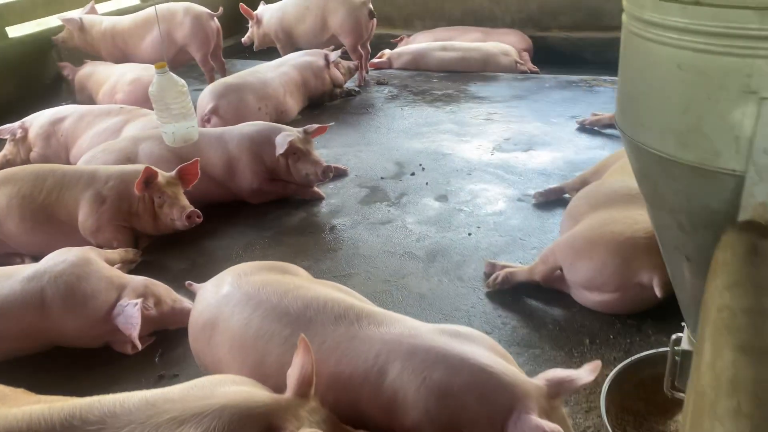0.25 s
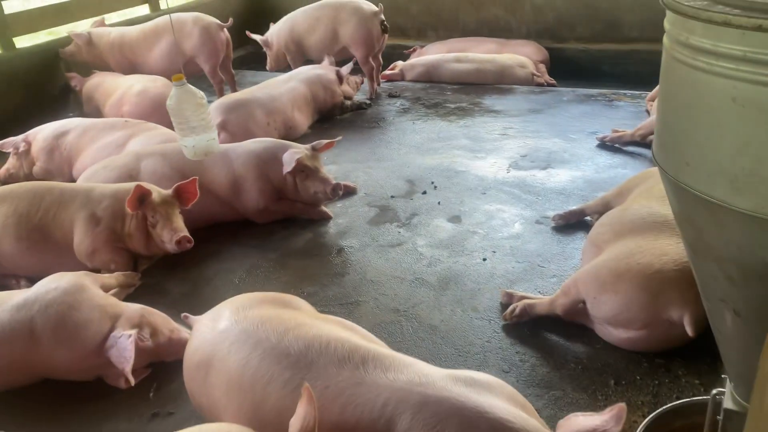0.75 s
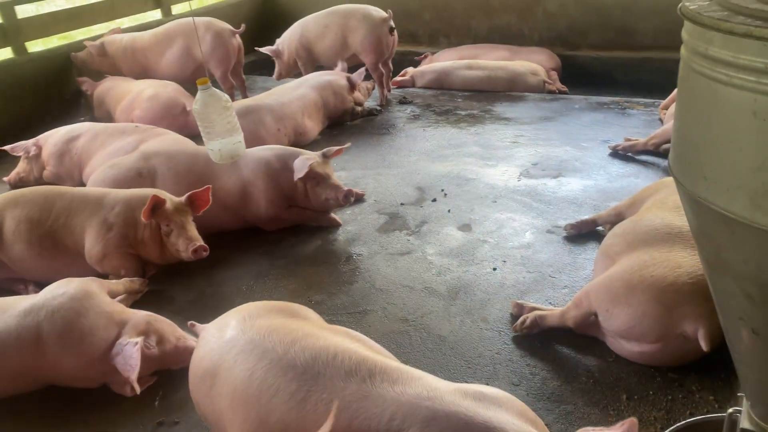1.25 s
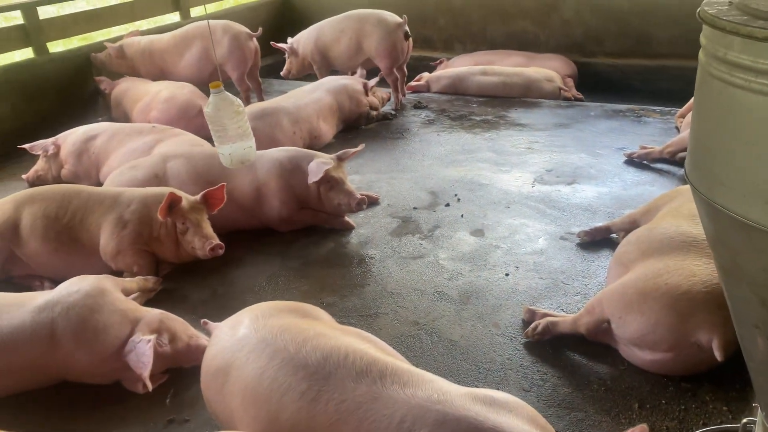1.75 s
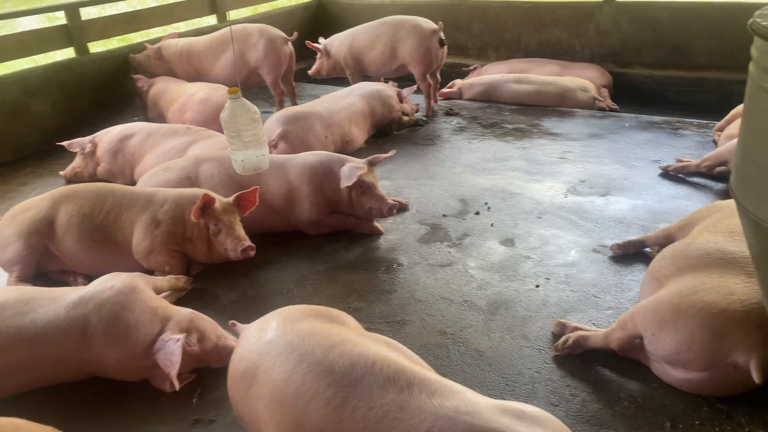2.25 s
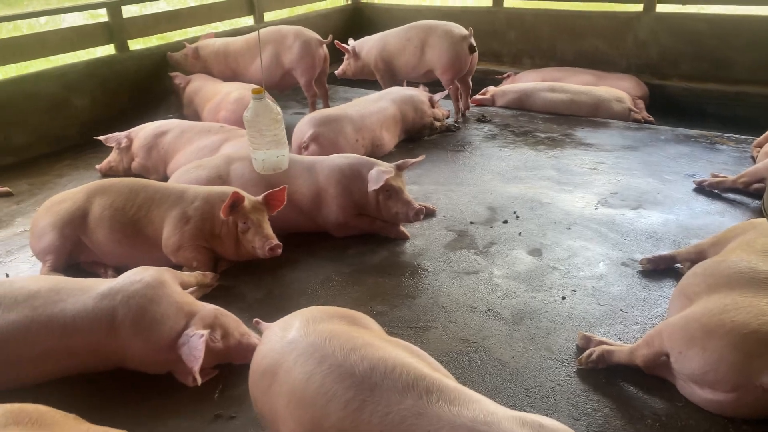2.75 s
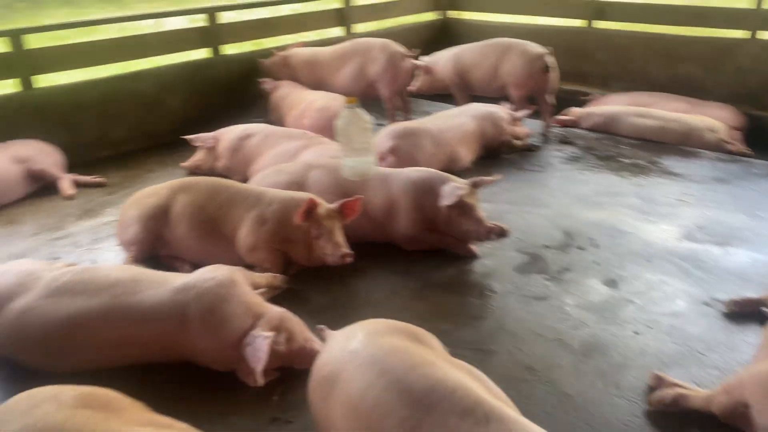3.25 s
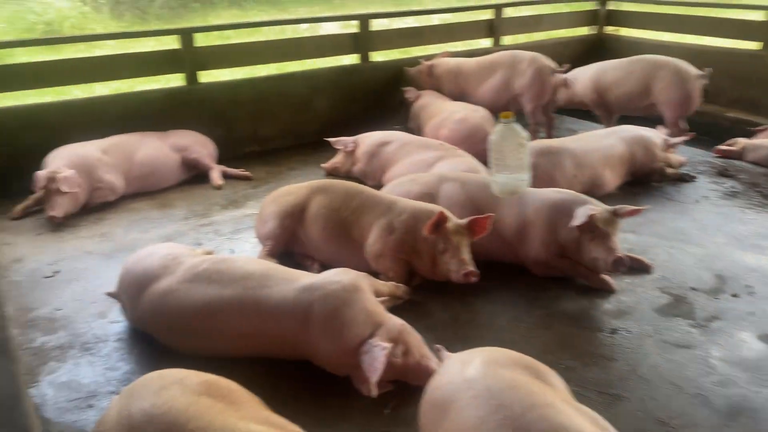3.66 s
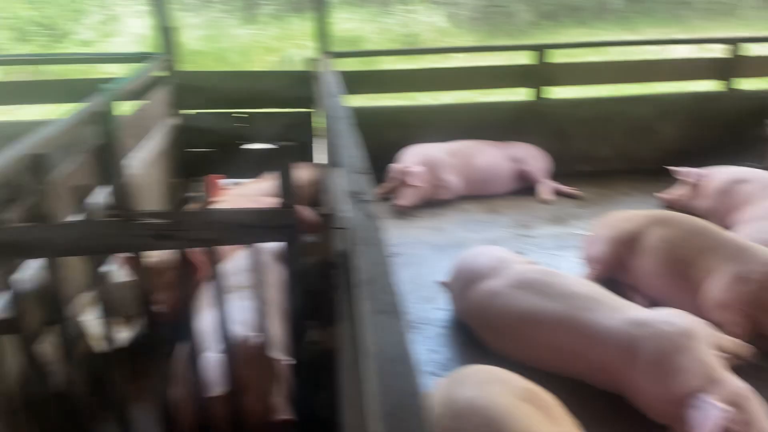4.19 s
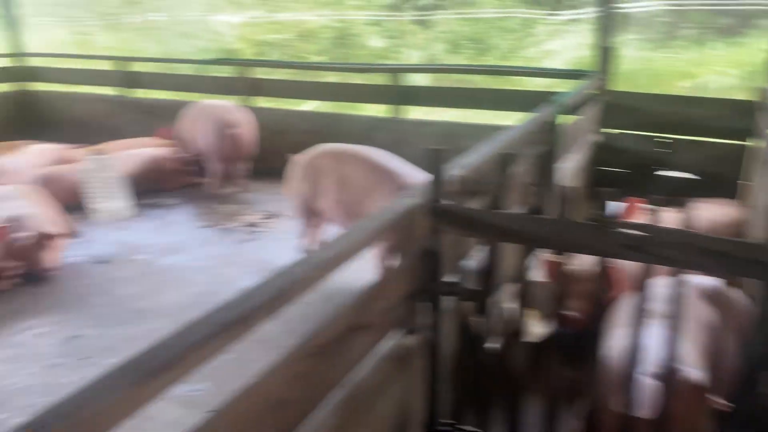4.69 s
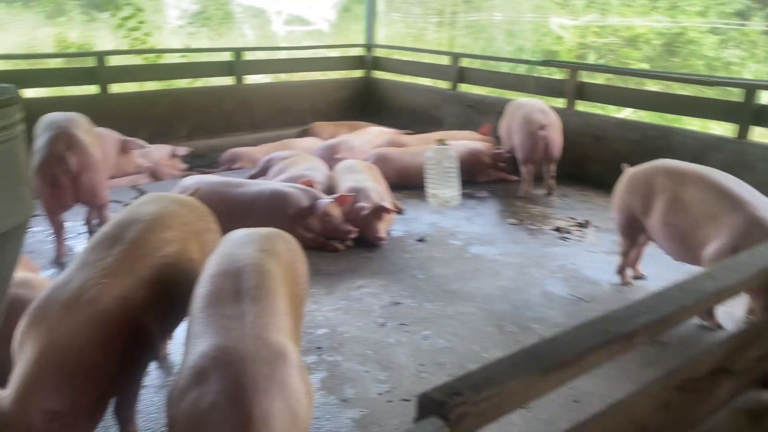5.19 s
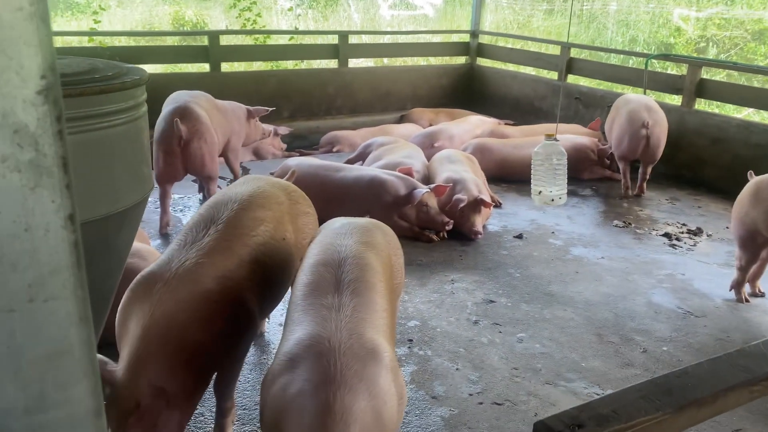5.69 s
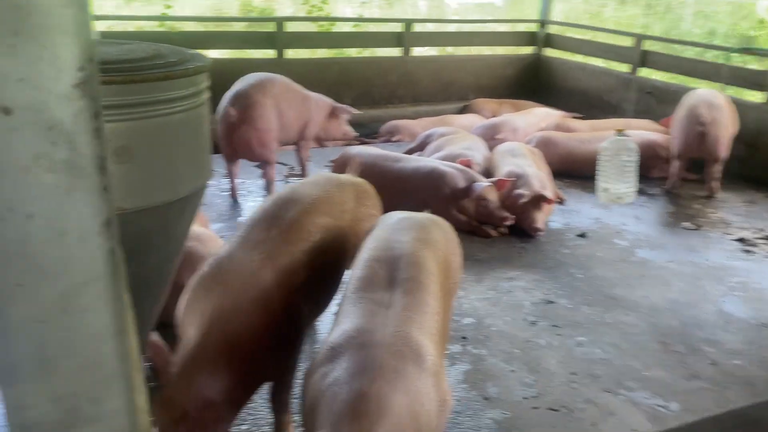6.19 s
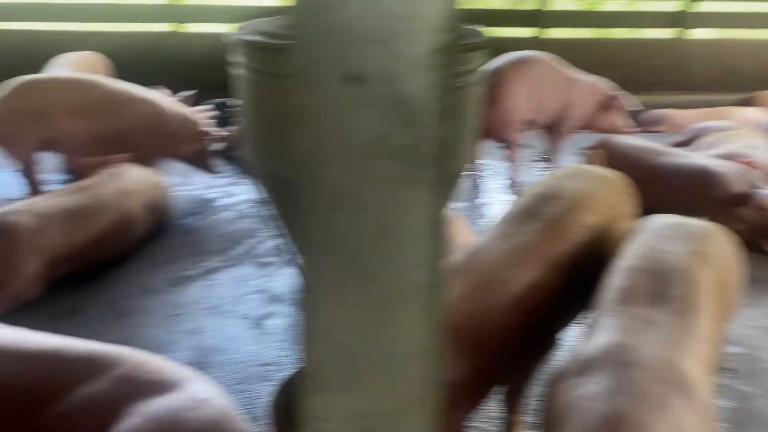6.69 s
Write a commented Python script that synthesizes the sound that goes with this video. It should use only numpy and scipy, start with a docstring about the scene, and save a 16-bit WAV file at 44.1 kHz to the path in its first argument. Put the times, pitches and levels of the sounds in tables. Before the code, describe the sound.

Pigs in an open concrete shed give short low grunts close by, over a throbbing herd murmur, soft thuds and bright ticking clicks.

```python
"""Pigs grunt close to a two-port microphone in an open concrete shed. Each grunt is a short train of slow
vocal-fold slaps, clicks with puffs of air, ringing in chest, throat, mouth, snout and nose.
Gliding tones make whines, a few steady partials make one low groan at first, and breath rushes under each grunt.
Farther pigs throb as a murmur of filtered noise, bodies thud low, and gear and hooves tick as bright cracks.
Feedback delays give the shed's echo; the two ports hear the near pigs with a small lag."""
import sys
import numpy as np
from scipy import signal
from scipy.io import wavfile

SR = 44100
rng = np.random.default_rng(int(sys.argv[2]) if len(sys.argv) > 2 else 0)


def digitize_waveform(pressure):
    """Quantize a signal to 16-bit integers and store it at the path in sys.argv[1].

    Rows of a 2-D input are taken as channels; values are limited to [-1, 1].
    """
    field = np.atleast_2d(pressure).T
    bounded = np.clip(field, -1, 1)
    quanta = np.round(bounded * 32767).astype(np.int16)
    wavfile.write(sys.argv[1], SR, quanta)


N = 306054

# Near grunts: first slap t/s, last slap t/s, slaps, share of the swell, hurry (above 0: gaps shrink at first),
#   nominal loudest point (0 first slap, 1 last) of chest, throat and mouth, the same of snout and nose,
#   left port's lag/ms before the stretch by resonance,
#   then nominal f/Hz and level/dB of chest, throat, mouth, snout and nose in turn,
#   breathiness level/dB, glide of all but the chest (share of f), level/dB of the snout's neighbour
#   against the snout, rasp f/Hz, rasp level/dB against the snout
GRUNTS = [(0.1305, 0.212, 4, 0.59, -0.07, 1.1, 0.42, -0.31, 195, -35, 420, -25, 1278, -27, 2770, -42, 4920, -32.5, 3, -0.091, 9, 7000, 7),
          (0.252, 0.343, 4, .9, 0.05, 0.6, 0.71, -0.25, 314, -33, 820, -60, 1210, -32, 1840, -31, 3820, -34, -4, -0.00029, -15, 2000, 2),
          (0.574, 0.651, 4, .5, 0.038, 0.57, 0.29, 0.066, 159.4, -46, 925, -36, 1060, -38, 2860, -45, 3800, -54, 2, 0.013, 0, 1900, 21.5),
          (0.8553, 0.9477, 4, 0.52, 0.18, 0.35, 0.45, 0.27, 204, -30, 915, -29.5, 1387, -27, 2164, -23.5, 4400, -32, 1.5, -0.02, -6, 2660, 5),
          (1.307, 1.352, 3, 0.64, 0.011, 0.54, 0.7, 0.35, 293, -34, 805, -35, 1226, -26, 1840, -69, 3000, -58, -4.5, -0.15, 0, 2000, 15),
          (1.405, 1.491, 4, 0.69, 0.074, 0.62, 0.0038, 0.25, 221, -31.5, 895, -29.5, 1363, -30.5, 2410, -33.5, 4200, -43, 6, -0.21, -1, 1930, 7),
          (1.8914, 2.041, 6, 0.99, 0.23, 0.59, 0.51, 0.17, 237, -20.5, 705, -18, 1360, -16.5, 2600, -19, 4100, -25.5, -8.5, -0.049, 0, 2820, 18),
          (1.883, 1.933, 3, 0.57, -0.087, 0.9, 0.97, .12, 211, -29, 373, -25.5, 1200, -47, 3310, -63, 5020, -32, 6.5, 0.0069, 0, 2000, 15),
          (2.217, 2.275, 3, .4, 0.041, 1, 0.66, 0.23, 226, -29, 930, -35, 1465, -25, 2620, -28.5, 3280, -34, 0, 0, -5, 1940, 12),
          (2.506, 2.554, 3, 0.81, -0.1, 0, 0, 0.29, 245, -65, 690, -38, 1325, -33, 2160, -59, 3430, -47, 0, -0.087, 0, 2000, 15),
          (2.6042, 2.665, 3, 0.76, -0.12, 0.76, 0.67, 0.48, 250, -30, 650, -27.5, 1160, -55, 2220, -68, 3370, -44, -0.5, -0.028, 0, 2000, 15),
          (3.7635, 3.8473, 4, 1, -0.23, 1, 0.58, 0.19, 204, -33.5, 830, -29, 1290, -31, 2160, -37.5, 3900, -25.5, -2, 0.04, -13, 4300, 24),
          (4.268, 4.367, 4, 0.91, -.01, 0.69, 0.64, 0.0045, 225, -37, 365, -28, 1102, -26.5, 2840, -36, 4960, -45, 5, 0.033, 3.5, 1770, 13.5),
          (5.258, 5.334, 4, 1.1, 0.038, 1.1, 0.83, 0.09, 207, -33, 820, -45, 1255, -36.5, 2380, -32.5, 5230, -38, -3.5, -0.026, -8, 4100, 0),
          (5.5514, 5.635, 4, .9, 0.0008, 0, 0.26, 0.34, 170, -34, 496, -58, 1025, -36, 2800, -65, 4000, -53, -3, -0.038, 0, 2020, 15),
          (5.903, 5.951, 2, 0.53, 0, 0.65, 0.5, 0.36, 186, -37, 600, -30.5, 1180, -45, 2550, -57, 4950, -60, 1, 0.018, 0, 2000, 15),
          (5.955, 6.041, 4, 1.1, 0.046, 0.2, 0.41, 0.19, 184, -33, 663, -28, 1225, -36, 2610, -36, 3550, -33, 2.5, -0.061, -4, 1840, 21),
          (5.965, 6.011, 3, 0.8, -0.044, 0.8, 0.89, 0.24, 187, -53, 500, -44, 1200, -55, 2550, -50, 4850, -36, 10.5, 0.0028, 0, 2000, 15),
          (6.215, 6.371, 7, 1.1, 0.043, 1, 0.75, 0.088, 209, -38, 940, -36.5, 1390, -37.5, 2500, -40, 3900, -49, 3, -0.22, -1, 1390, 22.5),
          (6.211, 6.2945, 4, 0.79, -0.16, 0.2, 0.69, 0.029, 205, -53, 500, -55, 1610, -45, 2920, -44, 3550, -39, 5, -0.15, 0, 2000, 15),
          (6.413, 6.493, 3, .9, -0.024, 0.9, 0.73, 0.16, 200, -61, 626, -43, 1180, -49, 1850, -56, 4080, -42, 2, 0.013, 0, 2000, 15),
          (6.786, 6.93, 6, 1.05, -0.1, 0.41, 0.96, 0.23, 188, -40.5, 820, -33, 1165, -38, 2530, -48, 4000, -63, 4, -0.048, -3, 2000, 10)]


def from_db(db):
    """Decibels to gain."""
    return 10 ** (np.asarray(db) / 20)


def rms_one(x):
    """Scale to rms 1."""
    return x / np.sqrt(np.mean(x ** 2) + 1e-20)


def in_time(rows, outside=None):
    """Curve columns, one value per sample."""
    s, *columns = np.transpose(rows)
    return [np.interp(np.arange(N) / SR, s, c, outside, outside) for c in columns]


def at_hz(points, hz):
    """Read a spectrum on a log frequency axis."""
    point_hz, values = np.array(points).T
    return np.interp(np.log(hz), np.log(point_hz), values)


def drift(rate_hz):
    """Slow chance of spread 1: noise through two equal one-pole low-passes, drawn every 40 samples."""
    r = np.exp(-2 * np.pi * rate_hz * 40 / SR)
    noise = rng.standard_normal(N // 40 + 2002)
    slow = signal.lfilter([1], [1, -2 * r, r * r], noise)[2000:]  # settled part only
    return np.interp(np.arange(N) / 40, np.arange(len(slow)), rms_one(slow))


def ring(x, hz, width_hz):
    """A damped resonance: a unit click rings with a height near 1, dying faster when it is wider."""
    r, w = np.exp(-np.pi * width_hz / SR), 2 * np.pi * hz / SR
    return signal.lfilter([0, np.sin(w)], [1, -2 * r * np.cos(w), r * r], x)


def bloom(x, hz, width_hz):
    """A resonance passed twice: a unit click swells softly to a height near 1, with dark skirts."""
    twice = ring(ring(x, hz, width_hz), hz, width_hz)
    return twice * 2 * np.pi * np.e * width_hz / SR


def add(out, sound, s, lag_ms=0.):
    """Mix a mono sound in at s seconds, later at the left port by the lag."""
    for side, late in zip(out, (lag_ms / 2000, -lag_ms / 2000)):
        i = round((s + late) * SR)
        side[i:i + len(sound)] += sound[:N - i]


def swell(start, length, level_db, rise_db_per_s, fall_db_per_s, hold_gain_db=0.):
    """Gain that rises to the start, grows by hold_gain_db over the length, then falls; steps of 40 samples."""
    t = np.arange(0, N + 40, 40) / SR - start
    db = level_db + np.minimum(t, 0) * rise_db_per_s - np.maximum(t - length, 0) * fall_db_per_s
    db += hold_gain_db * (np.clip(t / length, 0, 1) - 1)
    return np.repeat(from_db(db), 40)[:N]


def grunts(rasp_click=0.11, puff_s=0.0085, leak_share=0.065, side_above=1.17, side_spread=2.4,
           rasp_width_hz=690.0):
    """Each slap is a click and a dying puff; air leaks until the next; the tract shifts from slap to slap."""
    # One value each for chest, throat, mouth, snout and nose:
    width_hz = [78.5, 170, 91, 232, 420]  # width of each of the two passes [Hz]
    swell_db = [7.4, 8.9, 27, 11.2, 10.5]  # faintest slap under the loudest, at a full share of the swell [dB]
    # added to the loudest point; below 0 = earlier in the grunt, only the nose peaks later
    peak_shift = [-0.11, -0.07, -0.034, -0.081, 0.043]
    puff_gain = [.06, .045, .045, .04, .035]  # air noise against the click, at 0 dB breathiness
    lag_stretch = [1, 1, 1, 1.65, 1.65]  # treble goes the long way round the microphone housing
    swell_shape = 2.1  # higher = flatter top, steeper ends
    slap_scatter = .015  # spread of each resonance from slap to slap, as a share of its frequency

    out, size = np.zeros((2, N)), SR // 9
    t = np.arange(size) / SR
    click = t == 0
    for (first, last, slaps, share, hurry, low_top, high_top, lag_ms, *tract,
         air_db, glide, side_db, rasp_hz, rasp_db) in GRUNTS:
        places = np.linspace(0, 1, round(slaps))
        times = first + (last - first) * (places + hurry * places * (1 - places) ** 2)
        leak = leak_share * (t < (last - first) / (len(places) - 1))
        gate = np.exp(-t / puff_s) + leak
        for place, s in zip(places, times):
            for k, (hz, level_db) in enumerate(zip(tract[::2], tract[1::2])):
                top = high_top if k >= 3 else low_top
                chance_db, shift = rng.standard_normal(2) * [1.0, slap_scatter]
                from_top = abs((place - top - peak_shift[k]) / max(top, 1 - top))
                effort_db = chance_db - share * swell_db[k] * from_top ** swell_shape
                hz = hz * (1 + shift + glide * (place - .5) * (k > 0))
                puff = puff_gain[k] * from_db(air_db) * gate * rng.standard_normal(size)
                air = puff + click
                sound = bloom(air, hz, width_hz[k])
                if k == 3:  # a broad neighbour lies just above, and air rasps through the snout
                    sound += from_db(side_db) * bloom(air, side_above * hz, side_spread * width_hz[k])
                    rasp = ring(1.51 * puff + rasp_click * click, rasp_hz, rasp_width_hz)
                    sound += from_db(rasp_db) * rasp
                add(out, from_db(level_db + effort_db) * sound, s, lag_ms * lag_stretch[k])
    return out


def breath():
    """Power of the air rushing under the grunts; follows how loudly chest, throat or mouth, and snout ring."""
    # In the chests', mouths' and snouts' bands:
    base_db = [-34.5, -39, -46]  # under a resonance at -30 dB, at 0 dB breathiness [dB]
    follows = [0.38, 1, 0.28]  # share of a change in that resonance's level
    rise_db_per_s, fall_db_per_s, growth_db = 180, 183, 5.5

    power = np.zeros((3, N))
    for row in GRUNTS:
        first, last, air_db = row[0], row[1], row[18]
        chest_db, throat_db, mouth_db, snout_db = row[9:16:2]
        for k, ring_db in enumerate((chest_db, max(throat_db, mouth_db), snout_db)):
            level_db = base_db[k] + follows[k] * (ring_db + 30) + air_db
            gain = swell(first, last - first, level_db, rise_db_per_s, fall_db_per_s, growth_db)
            power[k] += gain ** 2
    return power


def whines(lag_ms=.03, edge=.4):
    """Air singing in one narrow resonance of chest or nose: a gliding tone of wandering height and phase."""
    # Hums and whines: start t/s, length t/s, from f/Hz, to f/Hz, level/dB before the fades at both ends
    whine_list = [(.10, 0.13, 175.7, 191, -37.5), (0.124, 0.043, 2000, 1950, -43),
                  (.22, 0.061, 1190, 1180, -41), (0.328, 0.022, 3220, 3270, -44),
                  (0.166, 0.054, 385, 420, -30.5), (0.169, 0.18, 3660, 3870, -48),
                  (0.558, 0.069, 897, 916, -40.5), (.64, 0.12, 5800, 5920, -56),
                  (.68, 0.051, 4900, 4900, -59), (.57, .07, 4900, 4700, -53),
                  (0.759, 0.058, 1118, 1120, -43.5), (0.902, .012, 4565, 4760, -37.5),
                  (0.927, 0.013, 1410, 1400, -31), (0.967, 0.028, 192, 197, -30),
                  (1.29, 0.11, 1202, 1211, -42.5), (1.773, 0.054, 1350, 1360, -44),
                  (1.925, .14, 451, 397.3, -36), (2.049, 0.011, 263, 240, -24),
                  (2.02, 0.17, 1404, 1338, -48), (2.264, 0.071, 940, 916, -37), (2.93, 0.26, 170, 170, -39),
                  (3.109, 0.088, 1910, 1910, -47.5), (3.121, 0.056, 1270, 1287, -44),
                  (3.136, 0.064, 352, 356, -44), (3.221, 0.13, 2370, 2190, -51),
                  (3.253, 0.089, 2110, 2090, -49.5), (3.244, .16, 1995, 2040, -52.5),
                  (3.248, 0.17, 1333, 1323, -45.5), (3.74, 0.038, 190, 179, -35),
                  (3.742, 0.015, 4130, 4000, -48), (3.854, 0.043, 1233, 1197, -42.5),
                  (3.878, 0.1, 1566, 1540, -51), (4.257, 0.037, 216, 208, -22),
                  (4.285, 0.08, 232, 228, -31.5), (4.306, 0.061, 392, 438, -31),
                  (4.3, 0.015, 5200, 5100, -43), (4.308, 0.075, 717, 760, -39),
                  (4.324, 0.036, 1070, 1158, -35.5), (4.355, 0.018, 1150, 1110, -39),
                  (4.354, 0.029, 233, 217, -24.5), (4.267, 0.017, 1850, 1820, -44),
                  (5.28, 0.072, 2350, 2100, -50), (5.34, 0.063, 800, 813, -48.5),
                  (6.05, 0.078, 3500, 3420, -56), (6.211, 0.084, 1450, 1330, -44),
                  (5.351, 0.09, 2130, 2005, -49), (5.33, 0.032, 1228, 1230, -44),
                  (5.562, 0.16, 1480, 1404, -53.5), (5.93, 0.13, 189.3, 172, -32),
                  (6.244, 0.053, 1684, 1690, -40), (6.337, 0.012, 4100, 4090, -46),
                  (6.341, 0.1, 1350, 1245, -42), (6.46, 0.16, 1230, 1143, -50),
                  (6.416, 0.013, 4090, 4100, -45), (6.449, 0.016, 4050, 4130, -41.5)]
    width_at_1khz_hz, width_power = 65, .6  # the width grows with pitch
    steady = 1.4  # the voiced part under the wandering one

    out = np.zeros((2, N))
    for start, length, from_hz, to_hz, level_db in whine_list:
        size = round(length * SR)
        width_hz = width_at_1khz_hz * (from_hz / 1000) ** width_power
        phase = 2 * np.pi * np.cumsum(np.linspace(from_hz, to_hz, size)) / SR
        r = np.exp(-np.pi * width_hz / SR)  # wanders as fast as the resonance is wide
        noise = rng.standard_normal((2, size + SR // 10))
        a, b = rms_one(signal.lfilter([1], [1, -2 * r, r * r], noise)[:, -size:])
        tone = (steady + a) * np.sin(phase) + b * np.cos(phase)
        add(out, from_db(level_db) * rms_one(tone) * np.hanning(size) ** edge, start, lag_ms)
    return out


def groan(waver_db=0.5):
    """A steady low voice: a few clean partials above an absent fundamental, each wavering in level."""
    # Course of the groan: t/s, fundamental f/Hz, level/dB that the partials are counted from
    course = [(0.04, 40.95, -50), (0.132, 40.84, -36.5), (0.272, 40.6, -41.5), (0.55, 40.55, -42.5),
              (0.82, 40.35, -42.5), (0.89, 40, -39), (0.95, 37, -55)]
    # Partials: multiple of the fundamental, level/dB against the course
    partial_list = [(2, 2), (3, 1.5), (4, -29), (5, -7.5), (6, -8.5)]
    pitch_hz = in_time(course)[0]
    level_db = in_time(course, outside=-120)[1]
    phase = 2 * np.pi * np.cumsum(pitch_hz) / SR
    partials = sum(from_db(db + waver_db * drift(3.3)) * np.sin(k * phase) for k, db in partial_list)
    return np.sqrt(2) * from_db(level_db) * partials


def ticks(spread=0.12, lag_ms=-0.092):
    """Gear and hooves: dying noise through one broad resonance makes a short bright crack."""
    # Ticks: t/s, peak level/dB, brightest f/Hz
    tick_list = [(2.8077, -34, 4960), (3.917, -26.5, 5430), (4.0981, -39, 5500), (4.3826, -26.5, 2840),
                 (4.384, -25.5, 6140), (4.388, -24, 5040), (4.8534, -47, 10600), (5.045, -40, 11500),
                 (5.0662, -29, 6340), (5.4134, -46, 10300), (5.435, -40, 10600), (6.251, -25.5, 4300),
                 (6.494, -30, 4700), (6.505, -27, 5170), (6.556, -25.5, 4820), (6.5714, -46, 5920),
                 (6.6694, -39, 7530), (6.6977, -37, 11400), (6.7125, -30, 5130), (6.919, -32, 4940)]
    t60_s = 0.029
    out, t = np.zeros((2, N)), np.arange(SR // 8) / SR
    for s, peak_db, hz in tick_list:
        dying = rng.standard_normal(len(t)) * from_db(-60 * t / t60_s)
        crack = ring(dying, hz, spread * hz)
        add(out, from_db(peak_db) * crack / np.abs(crack).max(), s, lag_ms)
    return out


def thuds():
    """Power of the low thuds of bodies and feet: each rises, holds and falls in the deepest register."""
    # Thuds: t/s, length held t/s, level/dB before the throb
    thud_list = [(0.348, .03, -36), (.54, 0.036, -38), (.83, 0.084, -33), (0.928, 0.03, -33.5),
                 (1.2, 0.04, -39), (1.352, 0.17, -38.5), (1.74, 0.037, -51), (1.91, 0.093, -34),
                 (2.06, 0.017, -35), (2.288, 0.0075, -27), (3.0, 0.11, -46), (3.3, 0.054, -50),
                 (3.84, 0.067, -40), (4.378, 0.0074, -28), (4.518, 0.017, -34), (4.679, 0.03, -38),
                 (4.89, 0.072, -43), (5.37, 0.058, -37), (6.26, 0.15, -35.5), (6.37, 0.013, -36),
                 (6.547, 0.18, -38.5)]
    rise_db_per_s, fall_db_per_s = 192, 263
    return sum(swell(*row, rise_db_per_s, fall_db_per_s) ** 2 for row in thud_list)


def throb(rate_hz, wander=0.42, sharp=7.6):
    """Loudness of far slaps: a sudden rise and a decay every uneven cycle."""
    cycle = np.cumsum(rate_hz * np.exp(wander * drift(4.6)) / SR) % 1
    return rms_one(np.exp(-sharp * cycle))


def register_gains():
    """Rumble, murmur, breath and thuds add in power in the five registers."""
    # Murmur of the farther pigs, before the throb: t/s, level/dB of the chests' band, of the mouths' band,
    #   of the snouts' band, of the rustle's band
    murmur = [(0.0, -32.5, -34.5, -44, -54), (0.27, -35, -38, -41.5, -53), (0.45, -41.5, -39, -44.5, -55.5),
              (0.85, -38, -39.5, -48.5, -59.5), (0.95, -42.5, -41, -47, -55.5),
              (1.85, -38.5, -42, -48.5, -56.5), (2.05, -38, -40.5, -46, -56.5), (2.57, -37, -39, -49, -57),
              (2.74, -42, -45.5, -49, -54), (3.19, -38, -42.5, -48.5, -60.5), (3.54, -44, -45.5, -51, -56),
              (4.33, -40.5, -44, -49, -57), (4.89, -38.5, -42.5, -48.5, -56.5), (5.2, -46, -45, -51.5, -57),
              (5.43, -38.5, -42, -46, -53.5), (5.82, -44.5, -45, -50.5, -57.5),
              (6.2, -41.5, -45, -49.5, -57.5), (6.43, -39, -39, -48, -54.5), (6.63, -40, -41.5, -48, -55),
              (6.94, -48, -52.5, -57, -58.5)]
    rumble_db = -47.5
    power = from_db([np.full(N, rumble_db), *in_time(murmur)]) ** 2
    power[0] += thuds()
    power[1:4] += breath()
    return np.sqrt(power)


def herd(bass_patchy_db=2.5, treble_patchy_db=1.85, shared_db=1.11, throb_share=0.11):
    """Narrow bands of stereo noise; each register follows its level and throbs with its own pig."""
    # Edges between rumble, chests, mouths, snouts and rustle [f/Hz]
    register_edges_hz = [110, 450, 1600, 5500]
    # Colour within each register: f/Hz, relative level/dB per Hz
    colour = [(25, -68), (60, 12.5), (105, -1), (190, 2.5), (440, -9.5), (1250, -8), (1750, -21.5),
              (5200, -30.5), (7500, -111), (11000, -77.5), (16000, -140)]
    # Likeness of the two ports: f/Hz, correlation (-1 to 1)
    likeness = [(60, 0.94), (150, 0.99), (260, 0.58), (420, 0.38), (950, -0.26), (2380, 0.13),
                (5000, 0.091), (9000, 0.19), (15000, 0.34)]

    registers = np.zeros((5, 2, N))
    band_edges_hz = 28 * 2 ** np.arange(0, 9.4, .4)
    throbs = [throb(hz) for hz in (30.1, 33.95, 35.6, 38.3, 46.7)]
    together = drift(6.3)
    white = rng.standard_normal((2, 2, N))  # neighbouring bands take turns with two noise pairs
    for k, (low, high) in enumerate(zip(band_edges_hz, band_edges_hz[1:])):
        band = signal.butter(2, [low, high], "band", fs=SR, output="sos")
        mid, side = signal.sosfilt(band, white[k % 2])
        hz = np.sqrt(low * high)
        alike = np.clip(at_hz(likeness, hz), -1, 1)
        patchy_db = bass_patchy_db if hz < register_edges_hz[2] else treble_patchy_db
        gain = from_db(at_hz(colour, hz) + patchy_db * drift(7.7) + shared_db * together)
        stereo = np.sqrt(1 + alike) * mid + np.sqrt(1 - alike) * side * [[1], [-1]]
        registers[np.searchsorted(register_edges_hz, hz)] += gain * stereo
    return sum(level * rms_one(noise) * (1 - throb_share + throb_share * beat)
               for noise, level, beat in zip(registers, register_gains(), throbs))


def shed(x):
    """Concrete echo: eight feedback delays a side, duller on every round."""
    t60_s, wall_cut_hz = 0.42, 6400  # bass decay time; the walls' treble loss per round
    out, dull = np.zeros((2, N)), np.exp(-2 * np.pi * wall_cut_hz / SR)
    lags = (rng.uniform(.012, 0.051, 16) * SR).astype(int)
    for k, lag in enumerate(lags):
        loop, gain, state = x.copy(), from_db(-60 * lag / SR / t60_s), [0.]
        for i in range(lag, N, lag):
            back, state = signal.lfilter([gain * (1 - dull)], [1, -dull], loop[i - lag:i], zi=state)
            loop[i:i + lag] += back[:N - i]
        out[k % 2] += (loop - x) * (-1) ** (k // 2)
    return out


def scene():
    """Near pigs and ticks, with the echo of what reaches the left port, over groan and murmur."""
    echo_db = -13.5
    near = grunts() + whines() + ticks()
    echo = shed(near[0] + 1e-18)  # the tiny offset keeps the loops off denormal numbers
    return near + from_db(echo_db) * echo + groan() + herd()


def record(dry):
    """The left port is a little louder below the treble, softer in a band above; deep bass and top are cut."""
    left_db, left_below_hz = 1.8, 4000  # left against right
    dip_db, dip_hz = -3.5, [4300, 6500]
    bass_cut_hz, cutoff_hz = 42, 16150
    lows = signal.sosfilt(signal.butter(1, left_below_hz, fs=SR, output="sos"), dry)
    level = dry + lows * (from_db([[left_db / 2], [-left_db / 2]]) - 1)
    band = signal.sosfilt(signal.butter(1, dip_hz, "band", fs=SR, output="sos"), dry)
    level = level + band * (from_db([[dip_db / 2], [-dip_db / 2]]) - 1)
    level = signal.sosfilt(signal.butter(4, bass_cut_hz, "high", fs=SR, output="sos"), level)
    return signal.sosfilt(signal.cheby2(20, 70, cutoff_hz, fs=SR, output="sos"), level)


dry = scene()
out = record(dry)
digitize_waveform(out)
```